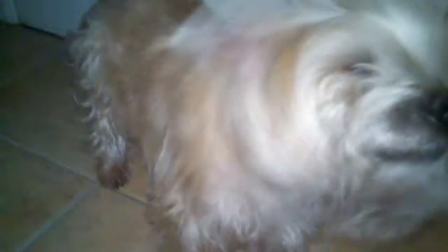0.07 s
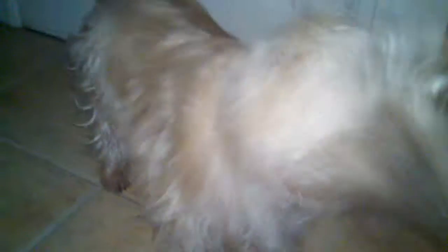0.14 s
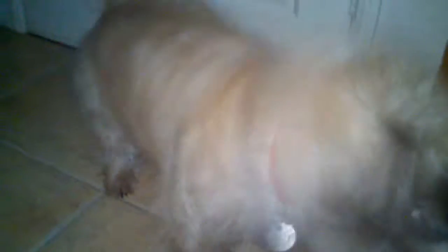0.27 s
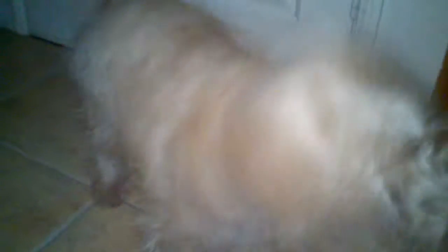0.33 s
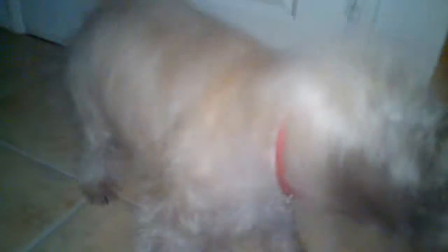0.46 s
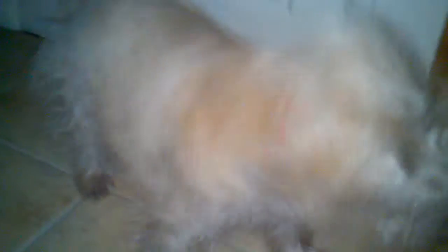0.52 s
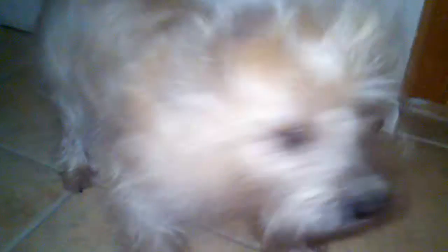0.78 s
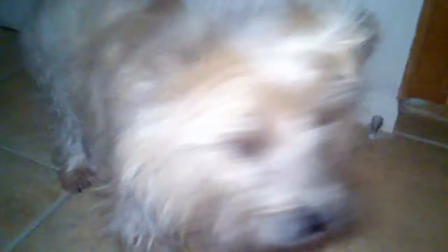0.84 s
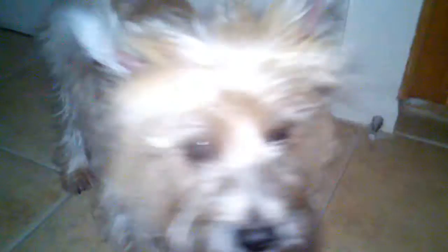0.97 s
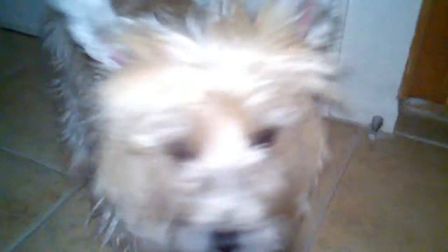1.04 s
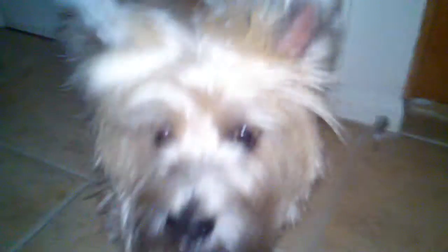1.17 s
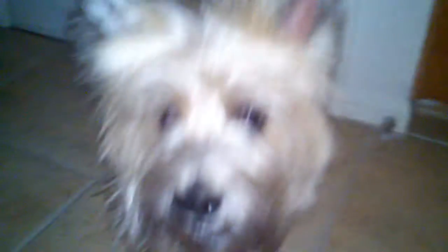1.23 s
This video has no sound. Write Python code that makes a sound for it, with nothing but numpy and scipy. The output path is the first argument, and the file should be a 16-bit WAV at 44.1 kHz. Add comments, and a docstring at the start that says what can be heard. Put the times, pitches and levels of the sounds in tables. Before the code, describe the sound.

Metal tags on a dog's collar jingle rapidly as it shakes its head in a tiled room

```python
"""A small dog shakes its head in a tiled room, over a faint steady room hush.
The coat rustle (filtered noise) swells and fades. Tags, buckle and collar ring clash again and again:
bursts of tiny ticks, with dying tones that the next clash damps. Loose ticks rattle in between.
Amid the clashes the ears flap: noise slaps on hollow resonances, made higher for one late faint tick,
perhaps a claw. A short echo follows metal, ears and tick."""
import sys
import numpy as np
from scipy import signal
from scipy.fft import rfft, irfft
from scipy.io import wavfile
from scipy.ndimage import uniform_filter1d

SR = 44100
rng = np.random.default_rng(int(sys.argv[2]) if len(sys.argv) > 2 else 0)


def waveform_to_disk(signal):
    """Save audio, clipped to [-1, 1], as 16-bit WAV at the path in sys.argv[1]."""
    frames = np.transpose(np.atleast_2d(signal))
    scaled = np.clip(frames, -1, 1) * 32767
    samples = np.round(scaled).astype(np.int16)
    wavfile.write(sys.argv[1], SR, samples)


N = 57330  # length of the scene in samples

# Loudness of the coat rustle over time: t/s, level/dB
COAT_LEVEL = [(0.0, -88), (0.216, -55), (0.416, -51), (0.578, -48.5), (0.744, -51.5), (0.948, -66.5),
              (1.3, -80)]
# Tone colour of metal clatter: f/Hz, relative level per Hz/dB
CLATTER_COLOUR = [(410, -52), (700, -25.5), (2080, -15), (3500, -1.5), (5330, -5.5), (8210, -1.5),
                  (10700, -9), (12200, -15.5), (14000, -12), (16000, -24.5)]
# Low tones of the first tag: f/Hz, relative level/dB, time to fall 60 dB/s
FIRST_TAG_LOW = [(6722, 0, .2), (6800, -9, .1)]
# High tones of the first tag: f/Hz, relative level/dB, time to fall 60 dB/s
FIRST_TAG_HIGH = [(11010, 0, .035), (11220, -4, .035)]
# Tones of the second tag: f/Hz, relative level/dB, time to fall 60 dB/s
SECOND_TAG_TONES = [(7760, -0.5, 0.24), (8013, -16.5, 0.033), (14330, -3, 0.28), (14670, -1, .08)]

TICK_SPREAD_DB, STRIKE_SPREAD_DB = 2, 2  # how much ticks and struck tones vary in size
COLLAR_T60_S = .017  # time for the collar ring to fall 60 dB


def amp(db):
    """Turn decibels into a plain multiplier."""
    return 10 ** (np.asarray(db) / 20)


def evened(x):
    """Scale a sound to an rms of 1."""
    return x / np.sqrt(np.mean(x ** 2) + 1e-20)


def add(mix, start_s, sound):
    """Lay a sound into the mix, cutting off what runs past the end."""
    part = mix[round(start_s * SR):][:len(sound)]
    part += sound[:len(part)]


def struck(x, response):
    """Let a signal excite a response, which is first scaled to unit energy."""
    return signal.oaconvolve(x, response / np.linalg.norm(response))[:len(x)]


def level(curve):
    """Turn points of time and dB into a multiplier for every sample."""
    s, db = np.transpose(curve)
    return amp(np.interp(np.arange(N) / SR, s, db))


def hiss(points):
    """Steady noise of rms 1 with the given spectrum, falling away beyond its end points."""
    f, db = np.transpose(points)
    hz = np.fft.rfftfreq(N, 1 / SR) + 1
    octaves_above = np.maximum(np.log2(hz / f[-1]), 0)
    octaves_below = np.maximum(np.log2(f[0] / hz), 0)
    spectrum_db = np.interp(np.log(hz), np.log(f), db) - 24 * octaves_above - 12 * octaves_below
    return evened(irfft(rfft(rng.standard_normal(N)) * amp(spectrum_db), N))


def room_hush():
    """The quiet room tone is steady coloured noise."""
    # Colour of the room tone: f/Hz, relative level per Hz/dB
    hush_colour = [(25, -6), (157, -2), (503, -1), (1040, -5.5), (1790, -7), (11900, -18), (13200, -10),
                   (16000, -13)]
    return amp(-68) * hiss(hush_colour)


def coat_rustle():
    """The rustle of the coat is coloured noise that swells and fades with the shake."""
    # Colour of the rubbing coat: f/Hz, relative level per Hz/dB
    coat_colour = [(35, -44), (60, -29.5), (268, -12.5), (1080, -20), (1150, -16.5), (1690, -16),
                   (3250, -12.5), (5500, -120)]
    return level(COAT_LEVEL) * hiss(coat_colour)


def colour(x, points, tilt_db=0):
    """Filter of unit energy with the given spectrum, tilted by tilt_db per octave in the treble."""
    tilt_from_hz = 3000
    hz = abs(np.fft.fftfreq(1024, 1 / SR)) + 20
    f, db = np.transpose(points)
    total_db = np.interp(np.log(hz), np.log(f), db) + tilt_db * np.log2(np.maximum(hz, tilt_from_hz))
    log_size = total_db * np.log(10) / 20
    # The Hilbert transform supplies phases that make the filter respond only after its input
    taps = np.fft.ifft(np.exp(np.conj(signal.hilbert(log_size)))).real[:512]
    return struck(x, taps)


def ticks(count, per_s, spread_db):
    """Tiny contacts at random moments, each one sample long with random sign and size."""
    hit, sign, size = rng.random((3, count))
    sizes = amp(-spread_db * np.log(np.maximum(size, .01)))
    return evened((hit < per_s / SR) * np.sign(sign - .5) * sizes)


def shaped(x, shape):
    """Put an envelope on random ticks, keeping the energy that the envelope promises."""
    return x * shape * np.linalg.norm(shape) / (np.linalg.norm(x * shape) + 1e-12)


def ring(modes, t, spread_db=0, late=0):
    """A struck thing rings in several dying tones; a spread lets each blow favour other tones."""
    total = 0
    for hz, db, t60 in modes:
        fading = amp(db + spread_db * rng.standard_normal() - 60 * t / t60)
        total = total + fading * np.sin(2 * np.pi * hz * (t - late))
    return total


def wander(span_s):
    """A random, smoothly changing curve of rms 1: noise averaged twice over a short span."""
    span = round(span_s * SR)
    return evened(uniform_filter1d(uniform_filter1d(rng.standard_normal(N), span), span))


def swing():
    """A tumbling piece turns towards and away from the listener, so its ring flickers."""
    swing_db, swing_s = 6, .003
    return amp(swing_db * np.minimum(wander(swing_s), 1))


def whip():
    """Flying tags change the sound's travel time, bending pitch most while the coat rustles hardest."""
    whip_m_per_s, whip_s, sound_m_per_s = 1.5, .008, 343  # whip speed is the rms at the coat's loudest
    coat = level(COAT_LEVEL)
    speed = wander(whip_s) * np.sqrt(coat / coat.max())
    return np.cumsum(speed) * whip_m_per_s / sound_m_per_s / SR  # travel time in seconds


def jiggle(t, hz):
    """The collar ring knocks on for a few moments, each knock a short clink of two tones."""
    jiggles_per_s, rise_s, fade_s = 1300, 0.0027, 0.0097
    shape = np.minimum(t / rise_s, 1) * np.exp(-t / fade_s)
    knocks = shaped(ticks(len(t), jiggles_per_s, TICK_SPREAD_DB), shape)
    clink = ring([(hz, 0, COLLAR_T60_S), (hz * 1.17, -11, COLLAR_T60_S)], t[:3000])
    return struck(knocks, clink)


def chatter(t, length_s):
    """Pieces of metal chatter: a dense burst of ticks rises, holds, then stops short."""
    ticks_per_s, rise_share, hold = 18000, .25, 1.4  # hold over 1 makes the end more abrupt
    shape = np.minimum(t / (rise_share * length_s), 1) * np.exp(-(t / length_s) ** hold)
    return shaped(ticks(len(t), ticks_per_s, TICK_SPREAD_DB), shape)


def buckle(burst, t):
    """A muffled piece of metal, excited by the chatter, gives short dull tones."""
    # Tones of the muffled metal: f/Hz, relative level/dB
    buckle_tones = [(3840, -5.5), (4295, 4.5), (5050, 3), (6010, 9.5), (7160, 13), (8200, -1.5), (8620, 6)]
    t60_s = 0.016
    tones = ring([(hz, db, t60_s) for hz, db in buckle_tones], t[:3000], STRIKE_SPREAD_DB)
    return amp(-7.5) * struck(burst, tones)


def clashes():
    """Each clash is a burst of ticks and sets the tags ringing until the next one damps them."""
    # Clashes of the metal: t/s, clatter level/dB, chatter length/s, treble tilt/dB per octave,
    # collar ring f/Hz, collar ring level/dB, first tag low level/dB, first tag high level/dB,
    # second tag level/dB (all levels relative)
    clash_list = [ (0.019, -52, 0.0085, -5, 3600, -68, -72, -77, -71),
                  (0.124, -33, 0.016, 4, 2600, -48, -70, -57, -49.5),
                  (0.148, -31.5, 0.021, 9, 3090, -47, -55, -44.5, -52.5),
                  (.204, -22.5, 0.014, 23, 3290, -37, -42, -62, -35.5),
                  (.221, -21, 0.0029, -7.5, 2547, -41.5, -51, -36, -40.5),
                  (0.237, -49, 0.0023, -11, 3020, -38, -43, -41, -41),
                  (.249, -23.5, 0.034, 20, 3100, -34, -37, -35.5, -40),
                  (.274, -22, 0.0031, -17, 2690, -34, -49, -47, -46),
                  (0.292, -26, 0.0036, 7, 3090, -27, -41, -32, -31.5),
                  (0.3014, -5, 0.0075, 6, 3530, -25.5, -62, -53, -59),
                  (.347, -24.5, 0.016, 5, 2760, -36, -54, -58, -55),
                  (.432, -4.5, 0.008, 1, 3494, -24.5, -44, -24.5, -52),
                  (.443, -19, 0.0026, -8, 3560, -30.5, -37, -34, -36),
                  (0.4957, -11, 0.015, 8, 3010, -29.5, -45, -32, -19),
                  (.510, -1, 0.002, 12.5, 2720, -29, -28, -13, -61),
                  (0.579, -13.5, 0.011, 5, 3150, -63, -47, -47, -27),
                  (.586, -2.5, 0.0088, 3, 3876, -24, -59, -44, -36),
                  (0.6, -13, 0.017, -1.3, 3470, -48, -59, -57, -60),
                  (0.642, -19.5, 0.0086, -8, 3200, -56, -49, -58, -63),
                  (.662, -3, 0.0011, -0.1, 3300, -28, -61, -23.5, -31),
                  (.684, -11.5, 0.0037, 9, 2850, -34, -72.5, -58, -55),
                  (0.744, -18, 0.0027, 5, 3300, -35, -50, -66.5, -50),
                  (.752, -4, 0.0083, 0.7, 3330, -37, -40, -49, -29.5),
                  (0.823, -25.5, 0.022, 0, 2500, -49.5, -48, -59, -40),
                  (0.852, -21.5, 0.022, 5.5, 3010, -28, -47, -56, -30.5),
                  (.863, -20.5, 0.0013, 4, 3080, -27.5, -37, -43, -37),
                  (.883, -24, 0.0049, 10, 3350, -59, -37.5, -44, -37.5),
                  (0.908, -35, 0.0043, 10, 3103, -39, -67, -69, -54),
                  (0.921, -42, 0.002, 1, 3100, -51, -64, -70, -69),
                  (0.97, -45, 0.017, 21, 3090, -49.5, -69, -52, -63),
                  (1.039, -38.5, 0.012, -1, 3470, -41, -63.5, -71.5, -58.5),
                  (1.098, -42, 0.015, -17, 3380, -61, -67.5, -77.5, -69),
                  (1.114, -31, 0.0094, 9, 3115, -45.5, -74, -71.5, -54.5),
                  (1.168, -34.5, 0.0062, 10.5, 3000, -52, -57.5, -77, -59),
                  (1.178, -38.5, 0.0071, 6, 2960, -55, -64, -85.5, -68),
                  (1.216, -42, 0.0091, 11.5, 3300, -59, -60.5, -72, -57.5)]
    early_s = .001  # each clash begins this long before its listed time
    damped_db, damp_s, ring_rise_s = -12, 0.0022, 0.00087
    pieces = FIRST_TAG_LOW, FIRST_TAG_HIGH, SECOND_TAG_TONES
    out, rings, t = np.zeros(N), np.zeros((len(pieces), N)), np.arange(12000) / SR
    travel = np.pad(whip(), (0, len(t)), "edge")
    next_starts = [row[0] for row in clash_list][1:] + [N / SR]
    for row, next_s in zip(clash_list, next_starts):
        s, clatter_db, length_s, tilt_db, collar_hz, collar_db, *rings_db = row
        burst = chatter(t, length_s)
        clatter = colour(burst, CLATTER_COLOUR, tilt_db) + buckle(burst, t)
        collar = amp(collar_db) * jiggle(t, collar_hz)
        add(out, s - early_s, amp(clatter_db) / 3 * clatter + collar)

        damping = amp(damped_db * np.clip((t - next_s + s) / damp_s, 0, 1))
        envelope = damping * np.minimum(t / ring_rise_s, 1)
        late = travel[round(s * SR):][:len(t)]
        for track, modes, ring_db in zip(rings, pieces, rings_db):
            tones = ring(modes, t, STRIKE_SPREAD_DB, late)
            add(track, s - early_s, amp(ring_db) * tones * envelope)
    return out + sum(track * swing() for track in rings)


def loose_rattle():
    """Loose ticks all through the shake, with a little ring of the same metal."""
    # Loudness of the loose ticks over time: t/s, level/dB
    rattle_level = [(0.0, -105), (0.176, -55.5), (0.304, -36), (0.42, -52.5), (0.668, -36.5), (0.756, -45),
                    (0.886, -49.5), (1.158, -104.5), (1.3, -86)]
    ticks_per_s, spread_db, ring_db, collar_hz = 4000, 3, -8.5, 3050
    t = np.arange(8000) / SR
    loose = ticks(N, ticks_per_s, spread_db) * level(rattle_level)
    tones = [(collar_hz, 9, COLLAR_T60_S), *FIRST_TAG_LOW, *FIRST_TAG_HIGH, *SECOND_TAG_TONES]
    metal = struck(loose, ring(tones, t)) * swing()
    return colour(loose, CLATTER_COLOUR) + amp(ring_db) * metal


def ear_flaps_and_tick():
    """A sharp noise slap and ragged aftertaps ring hollow resonances, for ears and a faint high tick."""
    # Slaps of the ears, and last a faint high tick, perhaps a claw:
    # t/s, relative level/dB, pitch ratio, fading time of the aftertaps/s
    slap_list = [(0.314, -34, 0.795, 0.013), (.393, -28.5, 1.08, 0.0068), (0.471, -27.5, 1.13, 0.0057),
                 (0.5507, -23.5, 1.13, 0.0054), (.626, -27, 1.025, 0.0051), (0.978, -45, 3.3, 0.0052)]
    # Hollow resonances: f/Hz before the pitch ratio, relative peak level/dB, time to fall 60 dB/s
    hollows = [(520, -3, .019), (1030, 0, .016), (1650, -1, .008), (2300, -2.5, .007), (3400, -3, .005)]
    slap_s, aftertaps_db = 0.00026, -8.5
    out, t = np.zeros(N), np.arange(3000) / SR
    for s, db, ratio, length_s in slap_list:
        envelope = np.exp(-t / slap_s) + amp(aftertaps_db) * np.exp(-t / length_s)
        push = rng.standard_normal(len(t)) * envelope
        knock = np.zeros(len(t))
        for hz, hollow_db, t60 in hollows:
            part = signal.oaconvolve(push, ring([(hz * ratio, 0, t60)], t))[:len(t)]
            knock += amp(hollow_db) * part / abs(part).max()
        add(out, s, amp(db) * knock / 2)
    return out


def above(x, hz):
    """Small things radiate no bass, so weaken everything below hz."""
    return signal.sosfilt(signal.butter(3, hz, "high", fs=SR, output="sos"), x)


def room_echo(x):
    """Tiled walls return a short, dense tail: fading noise after a small gap."""
    echo_db, t60_s, gap_s = -10, 0.21, 0.0024
    t = np.arange(16000) / SR
    tail = rng.standard_normal(len(t)) * amp(-60 * t / t60_s) * (t > gap_s)
    return amp(echo_db) * struck(x, tail)


def scene():
    """Mix the hush, the coat, the metal, the slaps and the echo of metal and slaps."""
    metal = above(clashes() + loose_rattle(), 970)
    slaps = above(ear_flaps_and_tick(), 330)
    dog = metal + slaps
    return (room_hush() + coat_rustle() + dog + room_echo(dog))[None]


def record(dry):
    """Remove the highest treble with a steep low-pass filter."""
    edge_hz = 15900
    low_pass = signal.firwin(511, edge_hz, window=("kaiser", 9), fs=SR)
    return signal.oaconvolve(dry, low_pass[None], "same")


dry = scene()
out = record(dry)
waveform_to_disk(out)
```